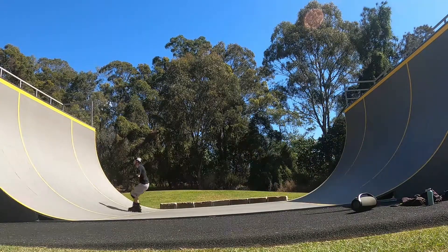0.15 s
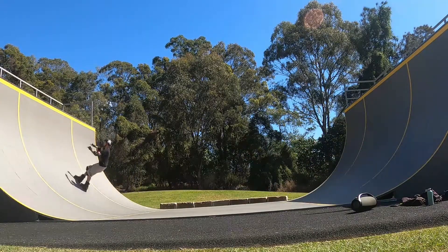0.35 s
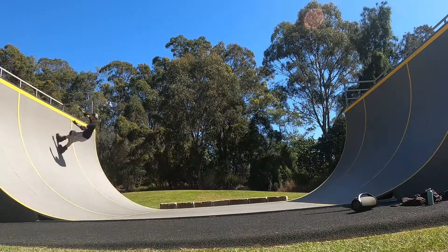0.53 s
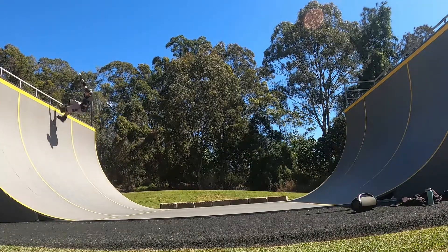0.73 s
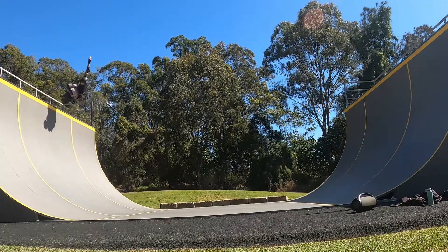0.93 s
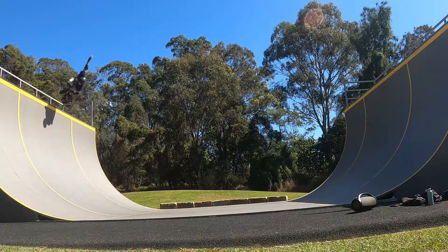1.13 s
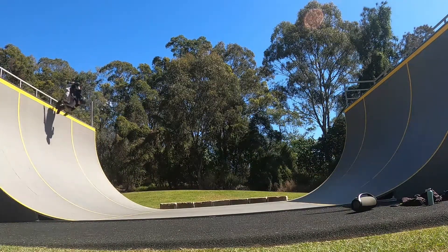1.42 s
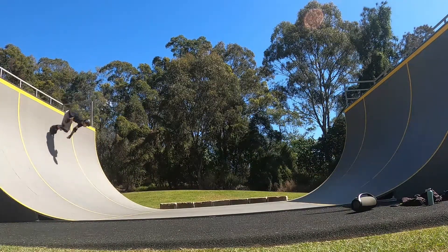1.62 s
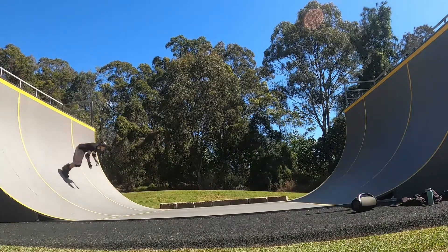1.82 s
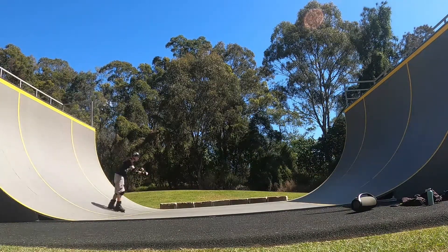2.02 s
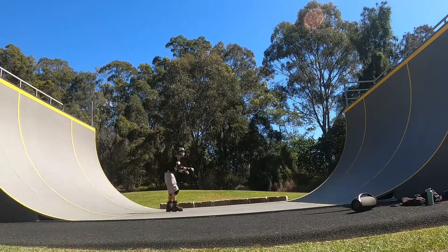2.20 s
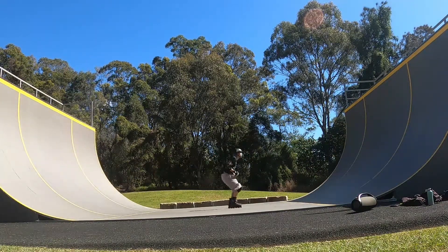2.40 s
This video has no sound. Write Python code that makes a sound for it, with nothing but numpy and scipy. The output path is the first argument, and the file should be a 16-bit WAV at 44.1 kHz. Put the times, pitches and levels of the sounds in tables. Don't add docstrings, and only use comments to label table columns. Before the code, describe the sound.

Inline skate wheels rumble on a hollow half-pipe deck, with knocks and gritty hiss growing around 0.3-0.8 s as they climb. The rolling drops out while airborne; a low distant engine, faint fan whine, soft leaves, a small boot tick at 1.2 and thin bird chirps at 1.0-1.5 remain. A sharp, booming landing at 1.7 rings the metal edge, a slap follows at 1.9, then bumpy rolling fades to 2.5.

```python
import sys
import numpy as np
from scipy import signal
from scipy.fft import rfft, irfft
from scipy.io import wavfile
from scipy.ndimage import uniform_filter1d

SR = 44100
rng = np.random.default_rng(int(sys.argv[2]) if len(sys.argv) > 2 else 0)


def boost_factor(decibels):
    exponent = np.asarray(decibels, float) / 20
    return 10 ** exponent


def waveform_to_disk(signal):
    frames = np.transpose(np.atleast_2d(signal))
    scaled = np.clip(frames, -1, 1) * 32767
    samples = np.round(scaled).astype(np.int16)
    wavfile.write(sys.argv[1], SR, samples)


N = 112455
T = np.arange(N) / SR
F = np.fft.rfftfreq(N, 1 / SR) + 1e-3
LANDING_S, SLAM_S = 1.73, 1.9

# t/s, deck load/dB, wheel scrape/dB, brightness/dB, stiffness of the deck underfoot/dB
ROLLING = [
    [(0, -33.5, -71.5, 14.5, -4.5), (.22, -48.5, -61.5, 5, 10.5), (.298, -43, -59, -6.5, -6.5),
     (.306, -34.5, -50, 11.5, -7), (.42, -31.5, -49, -4.5, 1.5), (.5, -30, -41.5, 3, -2.5),
     (.69, -33.5, -41, 3, 5), (.76, -31.5, -50, -3, -1), (.86, -38, -54.5, 1, 4.5)],
    [(1.86, -33, -48, -11.5, 4.5), (1.955, -41.5, -54, -2.5, 2.5), (1.964, -32.5, -44, -4.5, -2.5),
     (2.03, -30, -43.5, 8.5, 2), (2.12, -32, -42, 9, 7), (2.2, -31.5, -42.5, -6.5, -3),
     (2.3, -31, -52, -0.5, -1.5), (2.42, -36.5, -57.5, 1, 3), (2.55, -36, -58.5, -5, -5.5)],
]
# t/s, clack level/dB, boom level/dB
DECK_BLOWS = [(0.303, -50, -33), (0.3241, -53, -35.5), (0.3795, -65, -29.5), (0.469, -46, -28),
              (0.4984, -33.5, -27), (0.5276, -34, -30), (0.564, -55, -26), (0.5753, -45, -32),
              (0.5955, -39.5, -34), (0.622, -39.5, -26), (0.663, -42, -29.5), (0.729, -51, -25.5),
              (0.795, -57, -28), (1.706, -52, -33.5), (1.7182, -32, -19.5), (1.7198, -29.5, -41.5),
              (1.73, -31.5, -16.5), (1.739, -32.5, -33), (1.7496, -34.5, -25), (1.761, -36, -35),
              (1.7737, -45, -21.5), (1.7890, -43, -30.5), (1.82, -50.5, -22.5), (1.8440, -64, -28),
              (1.9588, -45, -34), (1.9888, -43, -29.5), (2.0185, -43.5, -27), (2.025, -46.5, -40),
              (2.0641, -40, -31.5), (2.0817, -38, -40), (2.1161, -35, -29.5), (2.1504, -43.5, -22),
              (2.1906, -45, -27.5), (2.2190, -52.5, -24.5), (2.262, -56, -35), (2.3003, -48, -24.5),
              (2.3773, -52.5, -25), (2.4809, -57, -36)]
# f/Hz, level/dB, t60/s
DECK_MODES = [(73, -5, 0.074), (98.7, -5.5, 0.091), (114.1, 2, 0.2), (146, 1.5, 0.11), (170.6, -1, 0.092),
              (202.2, 0, 0.12), (236.4, -6, 0.13), (296.5, -10, 0.075), (414, -22, 0.045),
              (503.5, -25.5, 0.17), (640, -36, 0.1)]
# t/s, firing f/Hz, level/dB (the level acts on the fan alone)
ENGINE_SPEED = [(0, 31.3, -5), (.75, 31.3, -2), (1.1, 31.35, 0), (1.45, 31.25, 0), (1.7, 30.95, 0),
                (2.55, 30.9, -3)]
# multiple of firing f, level/dB
ENGINE_ORDERS = [(2, -46), (3, -45), (4, -50), (5, -47.5), (6, -59.5), (7, -54), (8, -59), (9, -66.5),
                 (10, -60), (12, -63.5), (14, -71.5)]
# multiple of firing f, level/dB
FAN_LINES = [(36, -64.5), (42, -65.5), (48, -66)]
# line index, start t/s, end t/s, gain/dB
FAN_SWELLS = [(0, .76, .9, 4), (0, .94, 1.05, 4), (0, 1.54, 1.7, 6), (0, 1.45, 1.53, -10), (1, .86, 1.0, 3),
              (1, 1.14, 1.32, 5), (1, 1.4, 1.52, 3), (2, .8, .86, 4), (2, .88, .97, 3), (2, 1.0, 1.15, 3),
              (2, 1.22, 1.27, -10), (2, 1.28, 1.5, 5.5)]
# f/Hz, level per Hz/dB
AIR_SPECTRUM = [(12, -60.5), (20, -34.5), (48, -6), (102, 13), (129, -10.5), (166, -1.5), (277, -42),
                (381, -23), (900, -49), (1170, -58), (1980, -120)]
# t/s, length/s, start f/Hz, end f/Hz, level/dB
BIRD_NOTES = [
    (1.0, .25, 6150, 6100, -81),
    (1.285, .075, 6300, 5800, -78),
    (1.42, .075, 4700, 4520, -69),
    (.08, .16, 7800, 7750, -98),
]
# t/s, f/Hz, level/dB
SPAN_HUM = [(0.202, 99.66, -47), (.27, 111.7, -36.5), (0.329, 146, -27), (.42, 149.5, -34.5),
            (0.488, 176.4, -32.5), (.56, 175.4, -32), (0.64, 164, -49.5)]
# f/Hz, width/Hz, level/dB
BOOT_TICK = [(1900, 350, -66), (2700, 1200, -69), (1600, 200, -72)]
# f/Hz, level/dB, t60/s
RAIL_MODES = [(1105, -33, 0.3), (1210, -57, 0.18), (1440, -57, 0.17)]
# f/Hz, level/dB, t60/s
SLAM_MODES = [(231, -30, 0.11), (344, -42, 0.098), (522, -31, 0.07)]
# f/Hz, width/Hz, level/dB, left-right level/dB, left lead/rad
CASE_MODES = [(1062, 121, 3.5, 3, 0.27), (1364, 159, 1.5, 7.5, 0.03), (1890, 1050, -12.5, -0.5, -1.48),
              (3087, 160, -11, 8, -0.8), (3430, 250, -19, -16.5, -0.5), (4536, 1170, -14, -13.5, 2.5),
              (5116, 510, -9.5, -5.5, 1.96), (5640, 120, -12.5, -4.5, 1.4), (6516, 750, -23.5, -6.5, 4.5),
              (9400, 4100, -24.5, -1.5, 0.77)]


def unit(x):
    return x / np.sqrt(np.mean(x ** 2))


def ring(hz, width):
    return 1j * width * F / (hz ** 2 - F ** 2 + 1j * width * F)


def filt(x, response):
    return irfft(rfft(x) * response, N)


def walk(rate):
    return unit(filt(rng.standard_normal(N), 1 / (1 + (F / rate) ** 2)))


def grains(rate, spread_db):
    draw = rng.random((3, N))
    sign = (draw[0] < rate / SR) * np.sign(draw[1] - .5)
    return unit(sign * boost_factor(-spread_db * np.log(1 - draw[2])))


def control(column):
    up, down = np.array(ROLLING[0]), np.array(ROLLING[1])
    take_off = up[-1] + [0.01, -10, -6, 5, -0.5]
    descent = down[0] - [0.28, 25.0, 14.8, 9.8, 0.5]
    rows = np.vstack([up, take_off, descent, down])
    return np.interp(T, rows[:, 0], rows[:, column])


def deck():
    body = sum((-1) ** k * boost_factor(db) * ring(hz, 2.52 / t60) for k, (hz, db, t60) in enumerate(DECK_MODES))
    bumps_per_s = 1500
    scale = np.std(filt(grains(bumps_per_s, 0), body))
    force = grains(bumps_per_s, 1.5) * boost_factor(control(column=1))
    soft = 1 / (1 + (F / 207) ** 4)
    force = filt(force, soft) + filt(force, 1 - soft) * boost_factor(control(column=4))
    push_s = 0.002384
    push = sum(boost_factor(db) * np.exp(-((T - s - push_s) / (0.35 * push_s)) ** 2) for s, _, db in DECK_BLOWS)
    thud = -boost_factor(12) * filt(push, ring(184, 87))
    return filt(force - boost_factor(-12.5) * push, body) / scale + thud


def top_sheet():
    scrape_db = control(column=2)
    sheet = unit(filt(rng.standard_normal(N), ring(476, 123) ** 2))
    drive = boost_factor(scrape_db + 0.16 * (scrape_db + 46.5)) + boost_factor(-3) * clack_shape()
    return boost_factor(-12) * drive * sheet


def keen_band():
    return np.abs(ring(5150, 3200)) ** 2


def grit():
    crunch = grains(6000, 2.5) * boost_factor(control(column=2) + 1.6 * walk(26))
    keen = keen_band()
    return filt(crunch, 1 - keen) + filt(crunch, keen) * boost_factor(control(column=3))


def echo(x):
    tail = rng.standard_normal(N) * boost_factor(-60 * T / 0.57) * (T > .012)
    dull = 1 + 1j * F / 4020
    return boost_factor(-7) * filt(x, rfft(tail / np.sqrt(np.sum(tail ** 2))) / dull)


def air():
    hz, db = np.array(AIR_SPECTRUM).T
    x = filt(rng.standard_normal(N), boost_factor(np.interp(np.log(F), np.log(hz), db)))
    return boost_factor(-43 + 0.51 * walk(1.4)) * unit(x)


def leaves():
    both = rng.standard_normal(N) + 1.6 * rng.standard_normal((2, N))
    return boost_factor(-70 + 1.2 * walk(6.8)) * unit(filt(both, ring(3810, 1000) ** 2))


def engine(orders, waver_db, rate, follow):
    s, hz, level_db = np.array(ENGINE_SPEED).T
    turns = np.cumsum(np.interp(T, s, hz) * (1 + .0012 * walk(4))) / SR
    out = 0
    for k, db in orders:
        level = boost_factor(db + 1.5 + waver_db * walk(rate))
        out = out + level * np.sin(2 * np.pi * (k * turns + rng.random()))
    return boost_factor(follow * np.interp(T, s, level_db)) * out


def fan():
    out = 0
    for k, line in enumerate(FAN_LINES):
        swell_db = sum(db * ((T > start) & (T < end)) for which, start, end, db in FAN_SWELLS if which == k)
        swell = boost_factor(uniform_filter1d(1. * swell_db, size=900))
        out = out + swell * engine([line], 1.8, 12, 1)
    return out


def bird():
    out = 0
    for s, length, hz0, hz1, db in BIRD_NOTES:
        u = np.clip((T - s) / length, 0, 1)
        hz = hz0 + (hz1 - hz0) * u + 25 * walk(40)
        level = boost_factor(db + 1 + 1.2 * walk(30)) * np.sin(np.pi * u) ** .4
        out = out + level * np.sin(2 * np.pi * np.cumsum(hz) / SR)
    return out


def span_hum():
    s, hz, db = np.array(SPAN_HUM).T
    turns = np.cumsum(np.interp(T, s, hz) * (1 + .07 * walk(25))) / SR
    hum = boost_factor(np.interp(T, s, db) + 4.0 + 3.0 * walk(26)) * np.sin(2 * np.pi * turns)
    fade = np.clip(np.minimum(T - s[0], s[-1] - T) / .03 + 1, 0, 1)
    return hum * fade ** 2


def clack_shape():
    out = 0
    for s, db, _ in DECK_BLOWS:
        age = np.clip(T - s, 0, 1)
        decay = boost_factor(-60 * age / 0.087) + boost_factor(4.5 - 60 * age / 0.021)
        out = out + boost_factor(db) * decay * np.clip(age / 0.0013, 0, 1)
    return out


def clacks():
    clack = boost_factor(-6.5) * clack_shape() * rng.standard_normal(N)
    keen = keen_band()
    landing = np.abs(T - SLAM_S) < .11
    frames = boost_factor(-1) * filt(clack * landing, ring(2770, 3000) ** 2)
    return filt(clack, 1 - keen) + boost_factor(5.5) * filt(clack, keen) + frames


def tick():
    age = np.clip(T - 1.192, 0, 1)
    knock = sum(boost_factor(db) * unit(filt(rng.standard_normal(N), ring(hz, w) ** 2)) for hz, w, db in BOOT_TICK)
    return knock * boost_factor(9 - 60 * age / .06) * np.clip(age / .003, 0, 1)


def rail():
    age = np.clip(T - LANDING_S, 0, 1)
    out = 0
    for hz, db, t60 in RAIL_MODES:
        out = out + boost_factor(db - 3.0 - 60 * age / t60 + 2. * walk(40)) * np.sin(2 * np.pi * hz * age)
    return out * np.clip(age / 0.035, 0, 1)


def slam():
    age = np.clip(T - SLAM_S, 0, 1)
    out = sum(boost_factor(db - 60 * age / t60) * np.sin(2 * np.pi * hz * age) for hz, db, t60 in SLAM_MODES)
    return out * np.clip(age / 0.0045, 0, 1)


def ports(x, side):
    case = sum((-1) ** k * boost_factor(db + side * pan / 2) * ring(hz, w) * np.exp(.5j * side * lead)
               for k, (hz, w, db, pan, lead) in enumerate(CASE_MODES))
    edges = ring(1277, 3030) ** 2 * (1 + (F / 3000) ** 2) / (1 + (F / 7790) ** 30.0)
    sheen = ring(9160, 330) ** 2 + boost_factor(-21.5) * ring(11500, 5000) ** 2
    return boost_factor(9.0) * filt(x, case * edges + boost_factor(-43.5 + side * 4.5) * sheen)


def scene():
    boom = deck() + top_sheet()
    scrape = grit() + clacks()
    bass = boom + boost_factor(-4) * echo(boom) + span_hum() + slam() + air() + engine(ENGINE_ORDERS, 3.0, 13, 0)
    bass_level = np.sqrt(uniform_filter1d(bass ** 2, size=2000))
    loose_bass = boost_factor(-28.5) * unit(filt(rng.standard_normal(N), ring(160, 330) ** 2)) * bass_level
    hiss = boost_factor(-58 + 0.32 * walk(2)) * rng.standard_normal((3, N))
    tail = echo(scrape)
    scrape_level = np.sqrt(uniform_filter1d(scrape ** 2, size=200) + 1e-18)
    tones = fan() + tick() + rail()
    song = bird()
    out = []
    for side in (1, -1):
        lag = np.exp(-1j * np.pi * F * side * .000052)
        low = filt(bass + side * loose_bass, boost_factor(side * 1.8 / 2) * lag)
        loose = hiss[side] + 1.7 * echo(scrape) + scrape_level * unit(hiss[side])
        high = scrape + tail + hiss[0] + .55 * filt(loose, F / (F + 2500))
        pure = boost_factor(side * 4 / 2) * tones + boost_factor(-side * 7.3) * song
        out.append(low + ports(high, side) + pure)
    return np.array(out) + leaves()


def top_cut(x):
    return signal.sosfilt(signal.butter(12, 15500, fs=SR, output="sos"), x)


def record(dry):
    return top_cut(dry)


dry = scene()
out = record(dry)
waveform_to_disk(out)
```